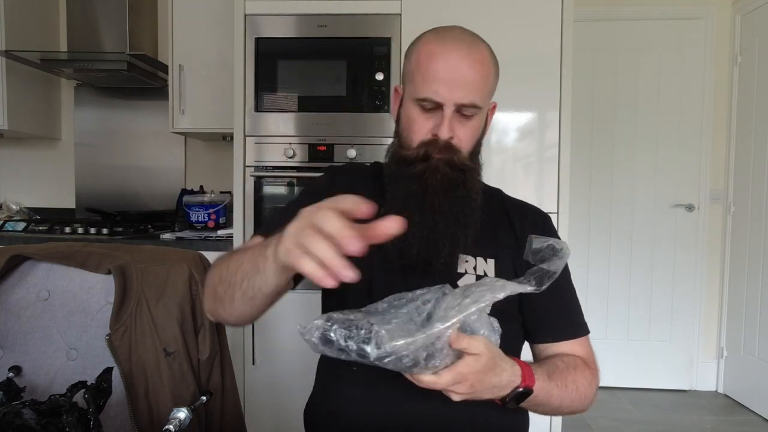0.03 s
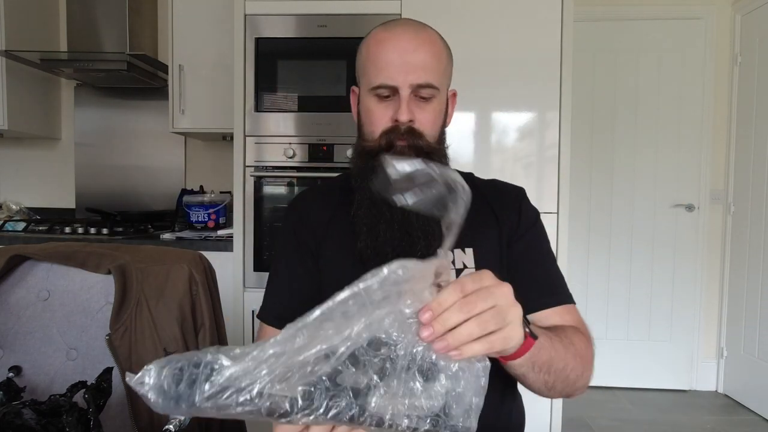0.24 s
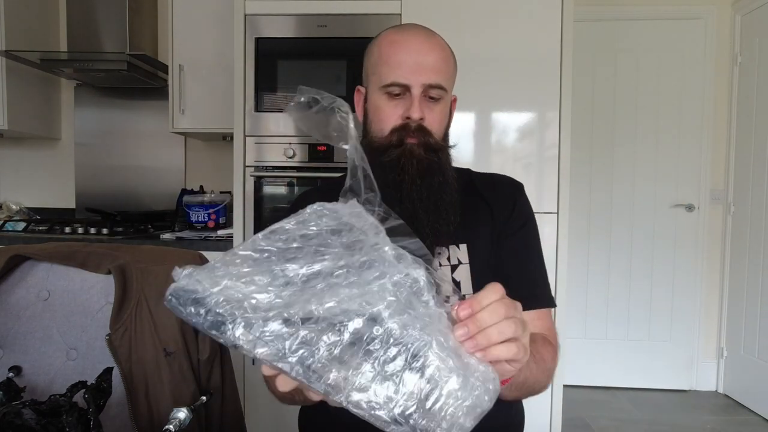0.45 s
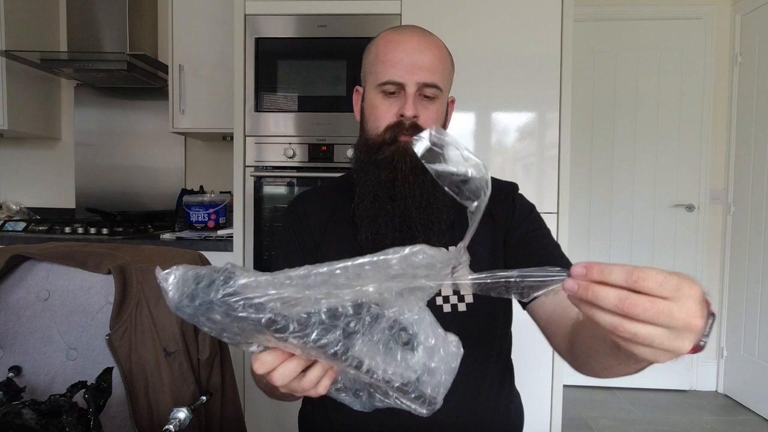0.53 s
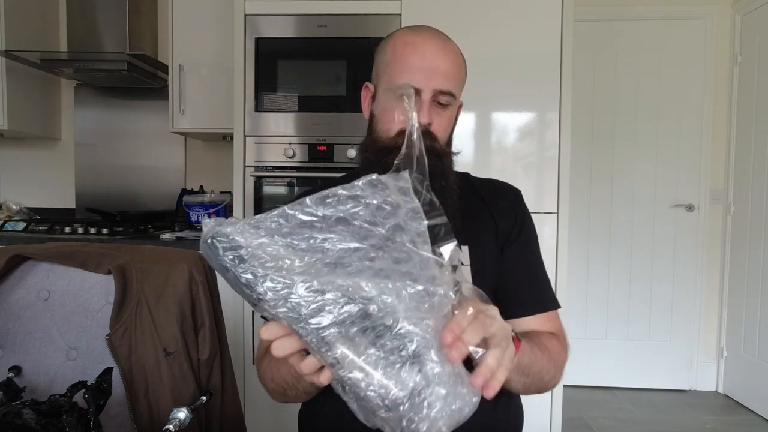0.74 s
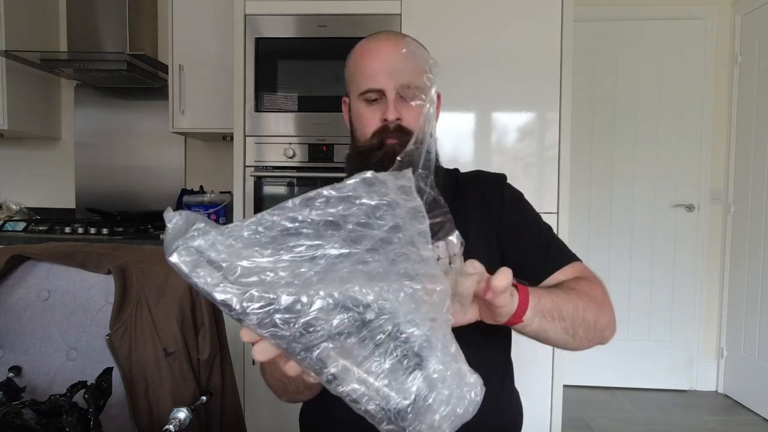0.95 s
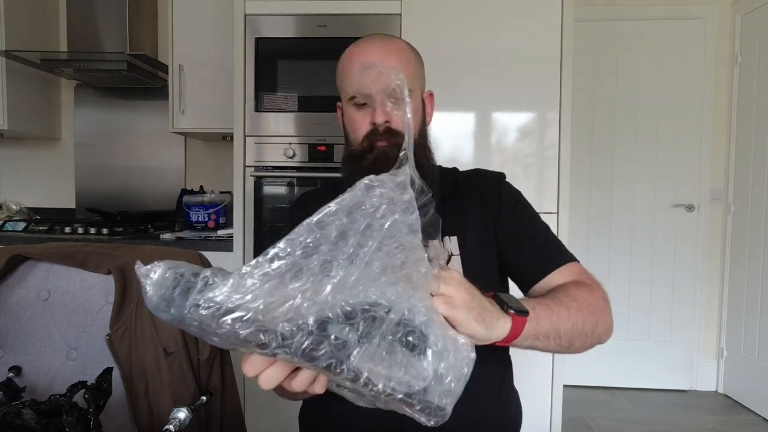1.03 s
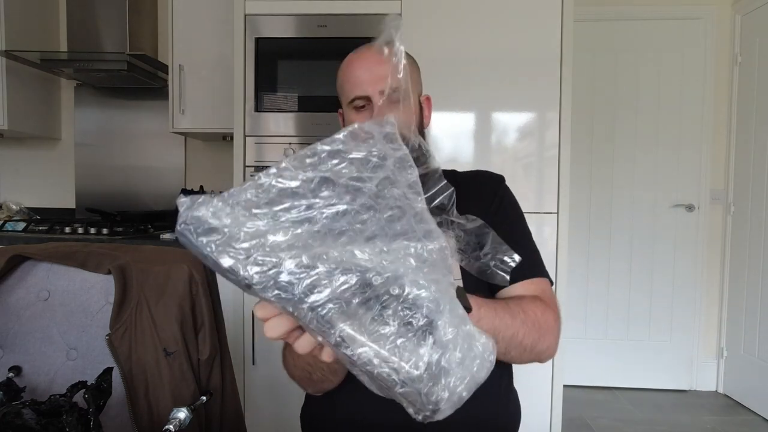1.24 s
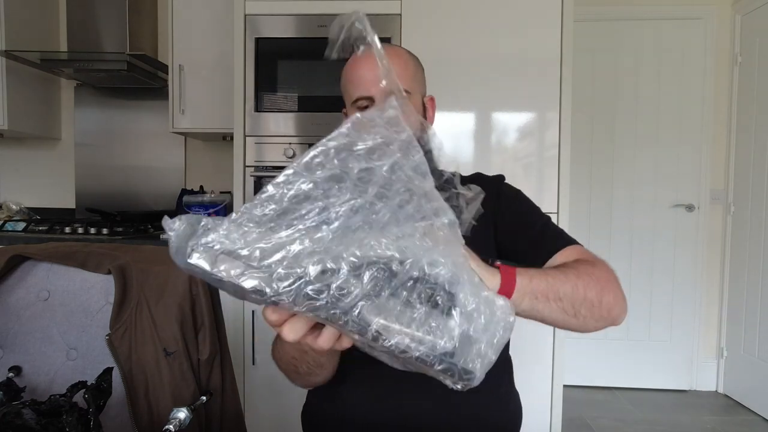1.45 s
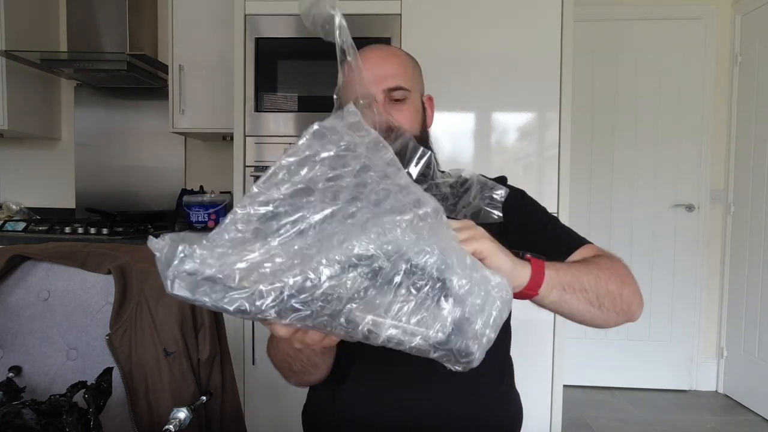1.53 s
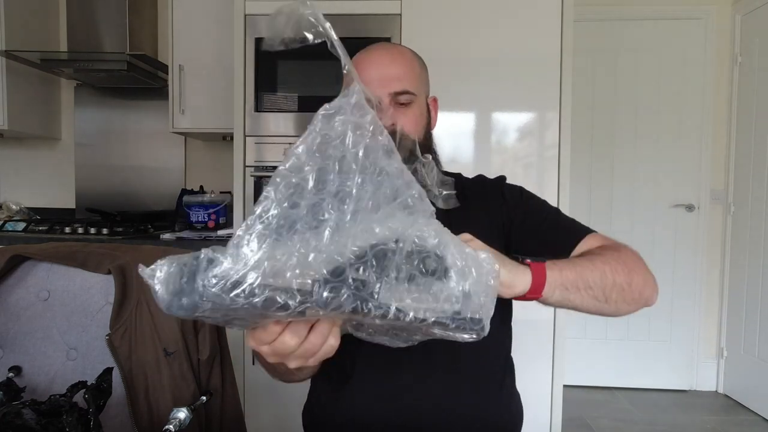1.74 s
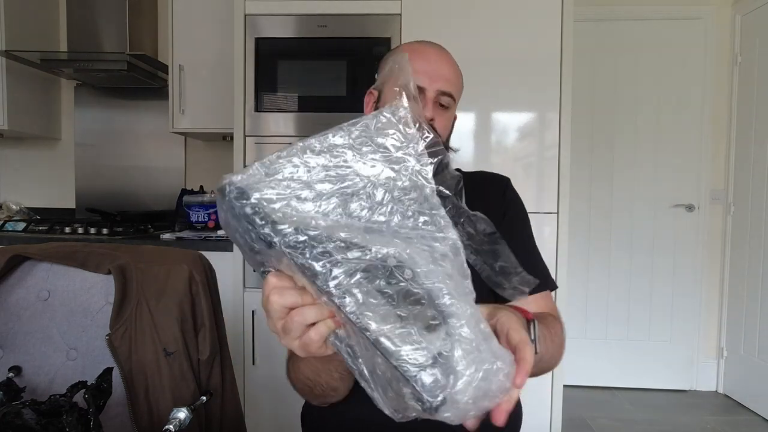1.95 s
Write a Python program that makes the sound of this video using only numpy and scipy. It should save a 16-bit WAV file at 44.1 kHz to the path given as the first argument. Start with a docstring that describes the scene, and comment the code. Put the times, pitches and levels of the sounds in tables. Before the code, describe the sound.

Bubble wrap crinkles close to the microphone in a quiet kitchen: scattered sharp snaps, a dense burst with a brief tape rip, a lull, then uneven clusters of bright crackles and hollow pops.

```python
"""In a kitchen, bubble wrap is pulled off a parcel close to the microphone.
Creases buckle as sharp snaps, each a coloured click with a shiver; many tiny clicks make swells of crackle and rustle.
Early on a strip of tape rips loose in a stick-slip run; air cells pop hollowly as short band-limited rings.
Taut film squeaks in wavering harmonics, the parcel knocks in damped modes, and a short room answers with dying echoes."""
import sys
import numpy as np
from scipy import signal
from scipy.fft import rfft, irfft
from scipy.io import wavfile
from scipy.ndimage import uniform_filter1d

SR = 44100
rng = np.random.default_rng(int(sys.argv[2]) if len(sys.argv) > 2 else 0)


def transcribe(signal):
    """Save signal, clipped to [-1, 1], as a 16-bit WAV file at the path in sys.argv[1]."""
    frames = np.atleast_2d(signal).T
    limited = np.clip(frames, -1, 1)
    pcm = np.round(limited * 32767).astype(np.int16)
    wavfile.write(sys.argv[1], SR, pcm)


N = 88200
TIME = np.arange(N) / SR
CUTOFF_HZ = 15800
KERNEL = 512   # length of a facet's click, samples
KERNEL_HZ = np.maximum(np.arange(KERNEL // 2 + 1) * SR / KERNEL, 40)
BEND_DELAY_S = 0.000565   # delay of a 1 kHz bending wave in the film; higher ones arrive sooner
RING_OCTAVES = 0.28   # half-width of a facet's resonance


def from_db(db):
    """Logarithmic level: decibels become an amplitude gain."""
    return 10 ** (np.asarray(db) / 20)


def rms_one(x):
    """Power normalisation: scale to rms 1."""
    return x / np.sqrt(np.mean(x ** 2) + 1e-20)


def at_hz(points, hz):
    """Spectral envelope: interpolate levels in dB along a log-frequency axis."""
    point_hz, point_db = np.transpose(points)
    return np.interp(np.log(np.maximum(hz, 1)), np.log(point_hz), point_db)


def add(out, start_s, sound):
    """Superposition: mix a sound in at its start time."""
    i = int(np.clip(start_s * SR, 0, N - 1))
    out[i:i + len(sound)] += sound[:N - i]


def dying_noise(db, t60, delay_s, size):
    """Diffuse decay: delayed, exponentially dying noise whose total energy is set by db."""
    t = TIME[:size]
    echoes = rng.standard_normal(size) * from_db(-60 * t / t60) * (t > delay_s)
    return from_db(db) * echoes / np.sqrt(np.sum(echoes ** 2) + 1e-20)


def resonance(hz):
    """Facet resonance: a bell of height 1 on the octave axis."""
    return 1 / (1 + (np.log2(KERNEL_HZ / hz) / RING_OCTAVES) ** 2)


def tick(db, ripple_db, count=26):
    """Minimum phase and dispersion: a facet's causal click, its spectrum rippled by chance, smeared by bending waves."""
    ripple_hz = np.linspace(np.log(KERNEL_HZ[1]), np.log(CUTOFF_HZ), count)
    ripple = np.interp(np.log(KERNEL_HZ), ripple_hz, rng.standard_normal(count))
    # folding the cepstrum forward in time makes the click minimum-phase
    cepstrum = irfft(np.log(from_db(db + ripple_db * ripple)))
    cepstrum[1:KERNEL // 2] *= 2
    cepstrum[KERNEL // 2 + 1:] = 0
    # phase lag whose group delay falls as the square root of frequency
    lag = 4 * np.pi * BEND_DELAY_S * np.sqrt(1000 * KERNEL_HZ)
    click = irfft(np.exp(rfft(cepstrum) - 1j * lag))
    return click * rng.choice([-1, 1])


GRAIN_RING_DB, GRAIN_RIPPLE_DB = 16, 5   # how much the grains differ in colour
GRAIN_LOW_HZ, GRAIN_HIGH_HZ = 1900, 13000   # range of their facets' resonances


def grains(spectrum, per_s, spread_db, count=24):
    """Random pulse train: tiny clicks of uneven size, dealt to facets of different pitch; rms 1."""
    sizes = from_db(spread_db * np.minimum(rng.exponential(1, N), 4))
    sizes = sizes * rng.choice([-1, 1], N)
    clicks = sizes * (rng.random(N) < per_s / SR)
    dealt = rng.integers(0, count, N)
    out = np.zeros(N)
    for k, hz in enumerate(np.geomspace(GRAIN_LOW_HZ, GRAIN_HIGH_HZ, count)):
        colour_db = at_hz(spectrum, KERNEL_HZ) + GRAIN_RING_DB * resonance(hz)
        facet = rms_one(tick(colour_db, GRAIN_RIPPLE_DB))
        out += signal.oaconvolve(clicks * (dealt == k), facet)[:N]
    return rms_one(out)


FLOOR_DB = -75.5   # rms
# relative spectrum of the room tone: frequency_hz, density_db
FLOOR_SPECTRUM = [(20, -2.5), (50, 3), (90, -0.5), (200, -9), (500, -19), (2000, -24), (16000, -32)]


def room_tone():
    """Stationary coloured noise: the faint low rumble and hiss of the kitchen."""
    colour = from_db(at_hz(FLOOR_SPECTRUM, np.arange(N // 2 + 1) * SR / N))
    noise = irfft(rfft(rng.standard_normal(N)) * colour, N)
    return from_db(FLOOR_DB) * rms_one(noise)


NEAR_DB, NEAR_T60_S, NEAR_DELAY_S = -8, 0.045, 0.0014   # scatter from the wrap, body and cupboards
ROOM_DB, ROOM_T60_S, ROOM_DELAY_S = -40.5, 0.4, 0.031


def reflections(x, db, t60, delay_s, count=16, size=12000):
    """Time-varying reverberation: each block gets a new echo pattern as the parcel moves."""
    out, step = np.zeros(N), N // count
    for i in range(0, count * step, step):
        echoes = dying_noise(db, t60, delay_s, size=size)
        add(out, i / SR, signal.fftconvolve(x[i:i + step], echoes))
    return out


RUSTLE_PER_S, RUSTLE_SPREAD_DB = 2100, 5.5   # click rate; mean size spread before capping
# light rustle under the moving hands, joined by straight lines: time_s, rms_db
HANDLING = [(0, -64.5), (.045, -60.5), (.14, -66), (.29, -52), (.37, -63), (.52, -62.5), (.56, -63.5),
            (.59, -64), (.638, -93), (.648, -60.5), (.73, -61), (.77, -59), (.87, -60.5), (1.0, -54),
            (1.09, -57), (1.17, -59.5), (1.3, -58), (1.37, -64), (1.51, -79), (1.555, -71.5), (1.61, -66.5),
            (1.69, -74), (1.81, -68.5), (1.845, -63.5), (1.87, -55.5), (1.93, -50), (2, -75)]
# relative colour of the rustle before its facets ring: frequency_hz, density_db
RUSTLE_SPECTRUM = [(100, -35), (300, -4), (700, -11.5), (1300, -1), (2200, -5), (4000, -5.5), (7000, -1.5),
                   (11000, -0.5), (16000, -3)]


def rustle():
    """Modulated grain noise: the film never quite rests while the hands move."""
    level_db = np.interp(TIME, *np.transpose(HANDLING))
    return from_db(level_db) * grains(RUSTLE_SPECTRUM, RUSTLE_PER_S, RUSTLE_SPREAD_DB)


KNOCK_ATTACK_S = .002
# hollow knocks of the handled parcel, level before modes and attack: start_s, level_db, pitch_hz, t60_s
KNOCKS = [(.135, -43, 410, 0.014), (0.295, -38.5, 390, 0.016), (.443, -35, 546, 0.025),
          (0.448, -47.5, 400, 0.048), (0.459, -39.5, 268, 0.017), (0.524, -42, 275, 0.009),
          (.595, -44, 360, 0.028), (0.649, -59.5, 221.4, 0.053), (0.915, -43, 344, 0.024),
          (.21, -64.5, 55.3, .15), (1.23, -50, 172, 0.031), (1.231, -51, 62, 0.068),
          (1.42, -58, 59.4, 0.069), (1.781, -63, 54.3, 0.1)]
# modes of the parcel: ratio to the pitch, level_db
KNOCK_MODES = [(.58, -7.5), (1, 0.5), (1.3, -5.5)]


def knocks(size=9000):
    """Modal decay: soft contacts ring a few damped modes of the air-filled parcel."""
    out, t = np.zeros(N), TIME[:size]
    attack = 1 - np.exp(-t / KNOCK_ATTACK_S)
    for start_s, db, hz, t60 in KNOCKS:
        ring = np.zeros(size)
        for ratio, mode_db in KNOCK_MODES:
            ring += from_db(mode_db) * np.sin(2 * np.pi * (hz * ratio * t + rng.random()))
        add(out, start_s, ring * from_db(db - 60 * t / t60) * attack)
    return out


SQUEAK_RASP_HZ, SQUEAK_RASP_DB = (2650, 3400), -3.5   # band of the rub; its rms against the fundamental's peak
SQUEAK_FOURTH_DB = -13   # fourth harmonic against the third
SQUEAK_WAVER, SQUEAK_SHIMMER = .015, .3   # rms share of pitch and of force that varies
SQUEAK_T60_S = .05
# slips of taut film, first and third harmonic against the second:
# start_s, held_rms_db, hold_s, pitch_hz, first_db, third_db
SQUEAKS = [(0.0797, -37.5, 0.0095, 3232, -13.5, -13.5), (0.0875, -41, 0.003, 3255, -11, -25),
           (0.097, -46, 0.0039, 3344, -1, 8), (0.152, -51, 0.008, 3260, -11, -5),
           (0.209, -48.5, 0.014, 3270, -4, -4), (1.4765, -34.5, 0.0043, 3264, -17, -11),
           (1.486, -40.5, 0.0023, 3820, -8, -12), (1.7368, -35.5, 0.0014, 3210, -30, -15),
           (1.7398, -44, 0.002, 3300, -27, -20), (1.7393, -41.5, 0.0026, 4050, -9.5, -26)]


def squeaks(size=6000, order=40):
    """Stick-slip friction: uneven in rate and force, held a moment, then ringing out; the rub rasps along."""
    out, t = np.zeros(N), TIME[:size]
    rasp_band = signal.butter(2, SQUEAK_RASP_HZ, "band", fs=SR, output="sos")
    for start_s, db, hold_s, hz, first_db, third_db in SQUEAKS:
        waver, force = rms_one(uniform_filter1d(rng.standard_normal((2, size)), order))
        phase = 2 * np.pi * np.cumsum(hz * (1 + SQUEAK_WAVER * waver)) / SR
        partials_db = [first_db, 0, third_db, third_db + SQUEAK_FOURTH_DB]
        tone = sum(from_db(part_db) * np.sin((k + 1) * phase) for k, part_db in enumerate(partials_db))
        rub = rms_one(signal.sosfilt(rasp_band, rng.standard_normal(size)))
        rasp = from_db(first_db + SQUEAK_RASP_DB) * rub
        slip = rms_one(tone * (1 + SQUEAK_SHIMMER * force) + rasp)
        add(out, start_s, slip * from_db(db - 60 * np.maximum(t - hold_s, 0) / SQUEAK_T60_S))
    return out


CRACKLE_PER_S, CRACKLE_SPREAD_DB = 5800, -0.5   # click rate; mean size spread before capping
# swells as the film crumples or the tape rips: crest_s, rms_db, rise_db_per_s, fall_db_per_s
CRUMPLES = [(0.063, -45.5, 3997, 898), (0.081, -42, 3000, 700), (0.162, -46.5, 493, 254),
            (0.203, -42, 2500, 398), (0.34, -50, 1200, 702), (0.403, -41, 652, 404),
            (0.433, -24.5, 1300, 669), (.492, -49, 2502, 1200), (0.596, -54, 1500, 1208),
            (0.829, -59, 515, 508), (0.97, -38, 1500, 598), (1.236, -35.5, 2501, 986),
            (1.326, -52.5, 2500, 504), (1.404, -44.5, 1095, 880), (1.441, -48.5, 2996, 900),
            (1.464, -31.5, 4004, 911), (1.478, -33, 1795, 915), (1.634, -45, 3497, 709),
            (1.656, -41, 1002, 613), (1.704, -36.5, 2194, 909), (1.74, -44.5, 4000, 698),
            (1.778, -45.5, 1304, 1102), (1.971, -47.5, 390, 184)]
# relative colour of the crackle before its facets ring: frequency_hz, density_db
CRACKLE_SPECTRUM = [(100, -39.5), (300, -15.5), (700, -15.5), (1300, -3), (2200, -7), (4000, -1.5),
                    (7000, 1.5), (11000, 1.5), (16000, -0.5)]


def crackle():
    """Incoherent power summation: many small creases give way together in swells that rise and die."""
    power = np.zeros(N)
    for crest_s, db, rise, fall in CRUMPLES:
        drop_db = np.maximum(rise * (crest_s - TIME), fall * (TIME - crest_s))
        power += from_db(db - drop_db) ** 2
    return np.sqrt(power) * grains(CRACKLE_SPECTRUM, CRACKLE_PER_S, CRACKLE_SPREAD_DB)


# air cells that dimple, level being the spectral peak: start_s, level_db, pitch_hz, width_hz
POPS = [(0.2687, -16, 2020, 397), (0.916, -7, 960, 610), (0.9797, 6, 2610, 603), (1.2303, 2, 1900, 352),
        (1.3294, -4, 1950, 550), (1.341, -6.5, 1860, 900), (1.4604, 3.5, 1945, 700), (1.4728, 0, 2080, 796),
        (1.8255, -7, 1120, 600)]


def pops(size=1500):
    """Impulse response of a resonator: an air cell dimples under a crease and rings for a few cycles."""
    out = np.zeros(N)
    for start_s, db, hz, width_hz in POPS:
        edges_hz = hz * np.exp(np.array([-.5, .5]) * width_hz / hz)
        cell = signal.butter(2, edges_hz, "band", fs=SR, output="sos")
        ring = signal.sosfilt(cell, signal.unit_impulse(size))
        add(out, start_s, from_db(db) * rng.choice([-1, 1]) * ring)
    return out


SNAP_RIPPLE_DB = 2   # chance variation of colour, shared by snaps and tape
RIP_START_S, RIP_RATE_HZ = .4318, 1400
RIP_DB, RIP_JITTER = -4, 0.071   # energy level of the largest slip; timing scatter as a share of the period
# relative colour of one slip of the tape: frequency_hz, level_db
RIP_SPECTRUM = [(200, -27), (700, -4), (1300, -5.5), (3500, -2.5), (7000, 3), (11000, 2.5), (16000, 0.5)]


def tape_rip(count=13):
    """Stick-slip peeling: the glue lets go in a short, nearly regular run of slips that swells and fades."""
    out = np.zeros(N)
    slip = rms_one(tick(at_hz(RIP_SPECTRUM, KERNEL_HZ), SNAP_RIPPLE_DB)) / np.sqrt(KERNEL)   # unit energy
    order = np.arange(count)
    times = RIP_START_S + (order + RIP_JITTER * rng.standard_normal(count)) / RIP_RATE_HZ
    swells = np.sqrt(np.sin(np.pi * (order + .5) / count))
    for start_s, swell in zip(times, swells):
        add(out, start_s, from_db(RIP_DB) * swell * slip)
    return out


SNAP_DB = -0.14   # trim of all snaps
SNAP_BASS_HZ, SNAP_DEEP_DB = 625, -10.5   # where the bass column applies; further fall at 100 Hz
SNAP_KNEE_HZ, SNAP_TOP_HZ, SNAP_TOP_DB = 1715, 10500, -0.5   # tilt starts; tilt ends; fall from there to the cutoff
RING_DB = 11   # height of a facet's resonance
FLUTTER_DB, FLUTTER_T60_S = -4.5, 0.0057   # the facet shivers after it flips
# colour common to all snaps: frequency_hz, level_db
FILM_COLOUR = [(1200, -1), (2000, -1.5), (2800, 0), (4000, -2.5), (5800, -0.5), (8500, -1), (12000, -1)]
# buckling creases, level at 5 kHz before trim, film colour, ripple and ring; bass is against the mids:
# start_s, level_db, treble_tilt_db_per_octave, bass_db, facet_ring_hz
SNAPS = [(0.025, -30.5, 0.5, -18, 2190), (0.0612, -23.5, 2.5, -3, 4240), (0.1686, -31.5, 13.5, -6, 3940),
         (0.1964, -28, -9, -31, 2980), (0.2015, -8.5, 4, -5, 3850), (0.2284, -25.5, -6, 0.5, 6490),
         (0.2691, -18.5, -5.5, -18.5, 4170), (0.2974, -26, 2, 4, 1430), (0.3447, -24, -2, -15, 2650),
         (0.3842, -21, 0, -17, 4440), (0.4017, -21, 7, 3, 4280), (0.4045, -15, 5.5, 3, 4710),
         (0.4095, -15, 3, -4, 5200), (0.4143, -19, 6, -6, 5200), (0.4164, -11, -2, -27, 4700),
         (0.4206, -13, -0.5, -16, 5100), (0.426, -15, 15, -27, 4500), (0.428, -11, -1, -17, 4340),
         (0.4288, -12.5, -1, -29, 4800), (0.44, -8.5, 0.5, -2.5, 11000), (0.4437, -10.5, 4, -5, 7100),
         (0.4449, -24, 4, -1, 9000), (0.4489, -10, -4.5, 1.5, 7940), (0.4551, -18.5, -7, 3, 5060),
         (0.4608, -21, -2.5, 10, 13000), (0.4738, -16, 3, 5, 1250), (0.4843, -22, 1, 2, 1370),
         (0.4887, -16.5, -1.2, 3, 1490), (0.4898, -17, -0.2, -5, 1090), (0.5209, -18.5, -0.5, 6, 1290),
         (0.5957, -30, 0.5, 1, 2660), (0.7233, -30, 2, -5, 3770), (0.7278, -31, -2, -3.5, 7140),
         (0.7753, -26.5, -0.5, -25, 7400), (0.7962, -28.5, -3.5, -40, 4370), (0.8277, -24, 2.9, -3, 2160),
         (0.8406, -29, 4, 6.5, 2530), (0.887, -25.5, -3, -17, 3180), (0.9163, -17.5, -5.5, -12, 2900),
         (0.9631, -12.5, -5.5, -25, 13000), (0.9677, -23, 12, -5, 2920), (0.9796, -6.5, -6.5, -31, 6000),
         (1.0194, -24, -4, -46, 12600), (1.1064, -22, 1, -15, 10600), (1.1341, -13.5, 5, -13, 1800),
         (1.152, -25, 3.5, -25, 4730), (1.1752, -14, -4.5, -19, 9150), (1.2089, -24, 3.5, -14, 13000),
         (1.2305, -8, 2, -12.5, 7900), (1.2314, -10, 3.5, -6, 2650), (1.2542, -21, -0.5, -4.5, 13000),
         (1.286, -28, -1.5, -1, 1140), (1.3262, -28.5, -5, -28, 2630), (1.3299, -20, -2.5, -12, 1980),
         (1.3429, -25.5, -4, -17, 2170), (1.3489, -17.5, 4, -6.5, 1900), (1.37, -25.5, 1, -9, 9500),
         (1.3877, -23, 4.5, -13, 2300), (1.3976, -24, -2, -31, 7230), (1.403, -13, -4.5, -19, 9600),
         (1.4062, -17, -3.5, -17, 6900), (1.4355, -28, 8, 5, 6200), (1.4606, -7, -3, -11, 8900),
         (1.473, -7.5, -4, -7.5, 7200), (1.4786, -11, 4, -3, 1900), (1.5225, -26, 1.5, -19, 6100),
         (1.5942, -26.5, 0.5, 6, 1520), (1.6295, -22, 3, -32, 5740), (1.635, -17, 4.5, -41, 3020),
         (1.646, -18, 3, -15, 1370), (1.6517, -14.5, 1, -15, 9100), (1.6575, -17, -3.5, -18.5, 1770),
         (1.6686, -18.5, 7.5, -18, 1800), (1.7026, -19, -2, -1, 7700), (1.7062, -11, -4, -21, 8150),
         (1.7575, -24.5, -5, -9, 4320), (1.7689, -21.5, 1.5, -18, 2390), (1.7784, -15.5, -2, -12, 1330),
         (1.8254, -21.5, -0.5, 7.5, 4940), (1.857, -34.5, -5, -5, 2500), (1.9112, -26.5, 3, -20, 9800),
         (1.9466, -17, 4, -23, 9000), (1.9674, -20, 10.5, -25, 7150), (1.9961, -15, -1, -17, 5350)]


def octaves():
    """Spectral tilt axis: octaves from 5 kHz, held constant outside the tilting range."""
    return np.log2(np.clip(KERNEL_HZ, SNAP_KNEE_HZ, SNAP_TOP_HZ) / 5000)


def snaps():
    """Buckling instability: creases flip over and shiver, big slack ones ringing low, small taut ones bright."""
    out = np.zeros(N)
    for start_s, db, tilt, bass_db, ring_hz in SNAPS:
        ends_db = at_hz([(100, bass_db + SNAP_DEEP_DB), (SNAP_BASS_HZ, bass_db), (SNAP_KNEE_HZ, 0),
                         (SNAP_TOP_HZ, 0), (CUTOFF_HZ, SNAP_TOP_DB)], KERNEL_HZ)
        colour_db = SNAP_DB + db + tilt * octaves() + ends_db
        colour_db = colour_db + at_hz(FILM_COLOUR, KERNEL_HZ) + RING_DB * resonance(ring_hz)
        click = tick(colour_db, SNAP_RIPPLE_DB)
        flutter = dying_noise(FLUTTER_DB, FLUTTER_T60_S, 0, size=1200)
        add(out, start_s, click)
        add(out, start_s, signal.fftconvolve(click, flutter))
    return out


def scene():
    """Superposition of direct and reflected sound: wrap and parcel, near and far echoes, room tone."""
    wrap = snaps() + pops() + tape_rip() + crackle() + rustle() + squeaks() + knocks()
    near = reflections(wrap, NEAR_DB, NEAR_T60_S, NEAR_DELAY_S)
    far = reflections(wrap, ROOM_DB, ROOM_T60_S, ROOM_DELAY_S)
    return (wrap + near + far + room_tone())[None]


def record(dry):
    """Band limitation: a steep elliptic low-pass cuts the top."""
    low_pass = signal.ellip(10, .2, 70, CUTOFF_HZ, fs=SR, output="sos")
    return signal.sosfilt(low_pass, dry)


dry = scene()
out = record(dry)
transcribe(out)
```